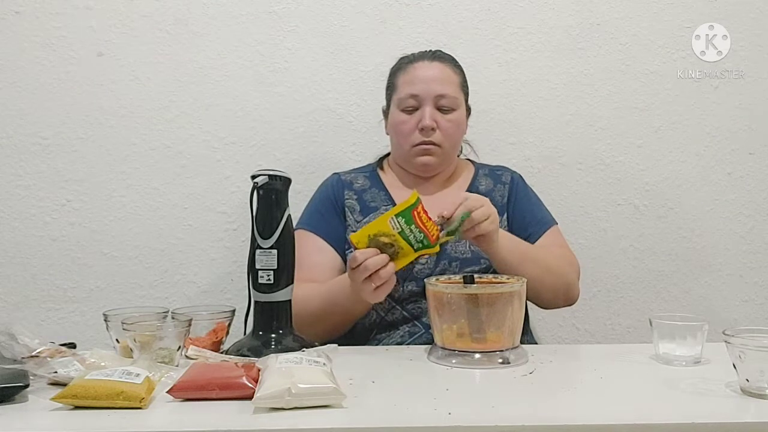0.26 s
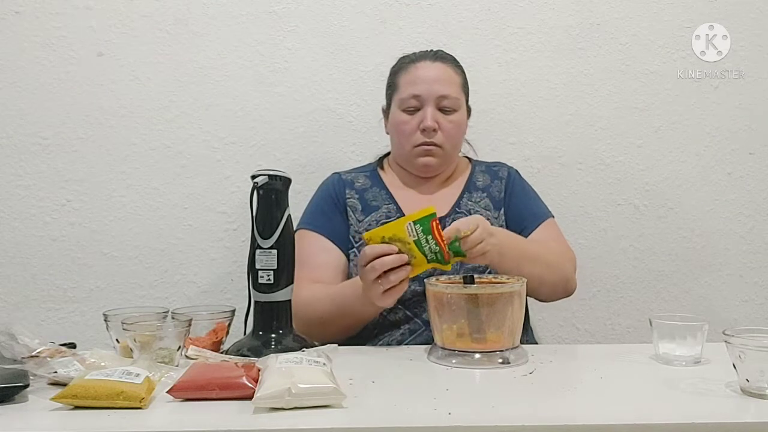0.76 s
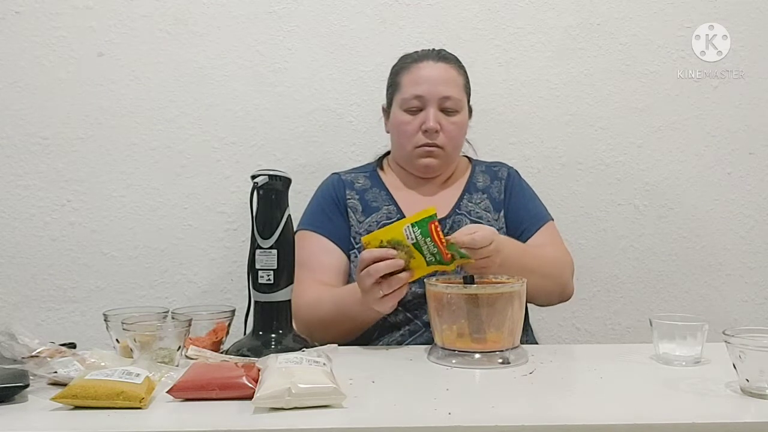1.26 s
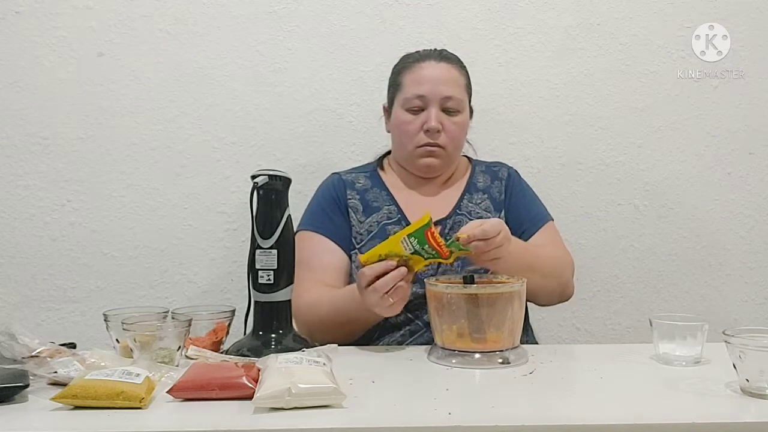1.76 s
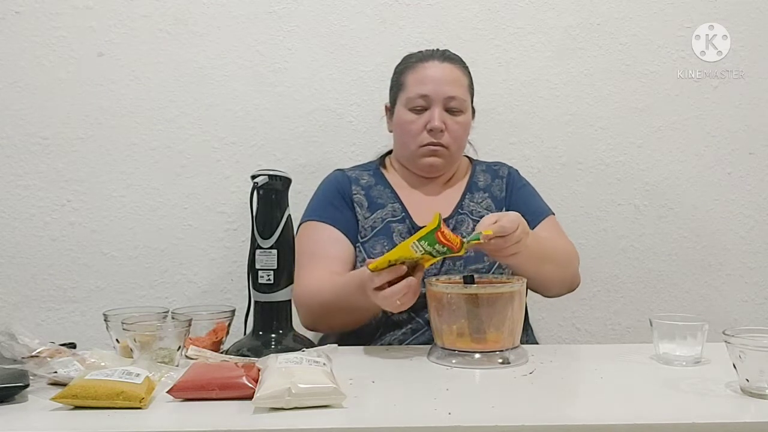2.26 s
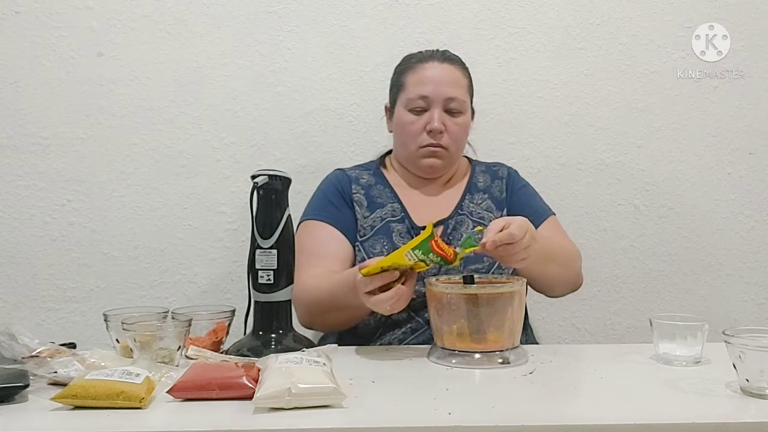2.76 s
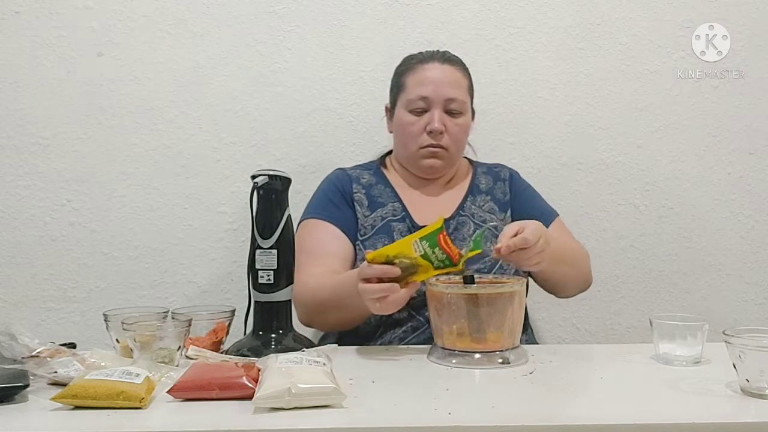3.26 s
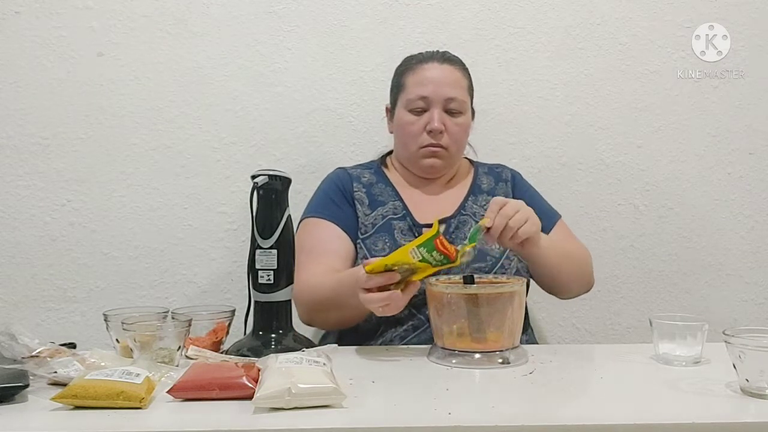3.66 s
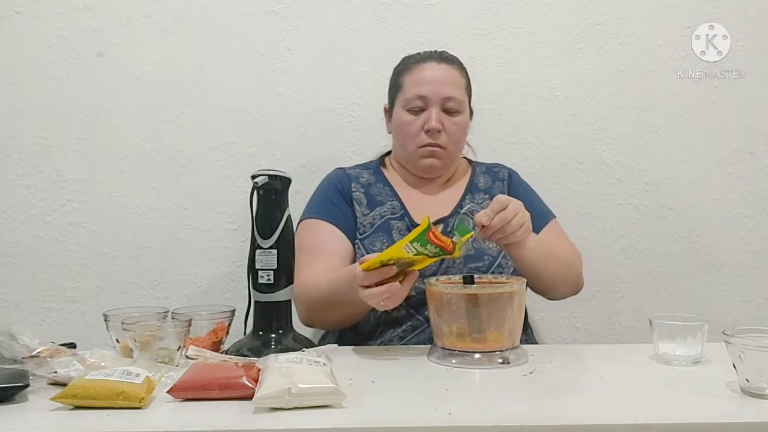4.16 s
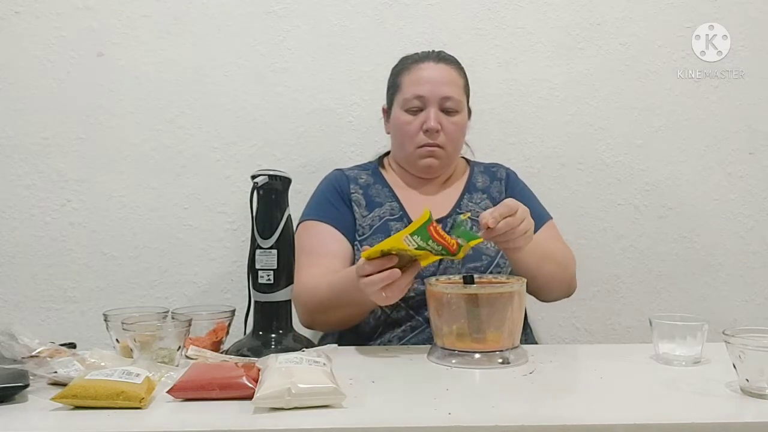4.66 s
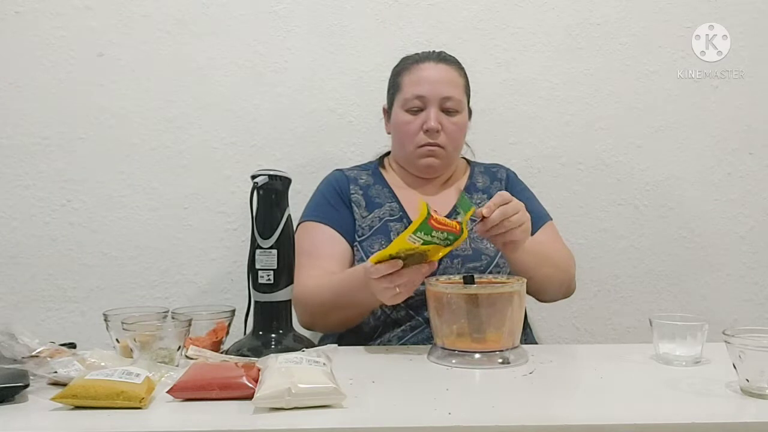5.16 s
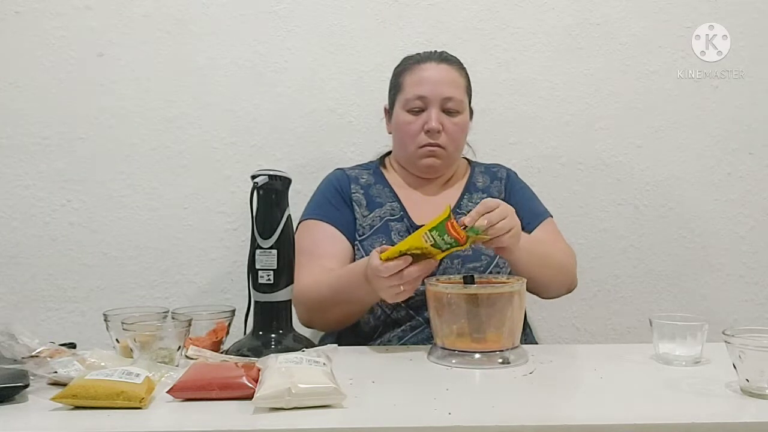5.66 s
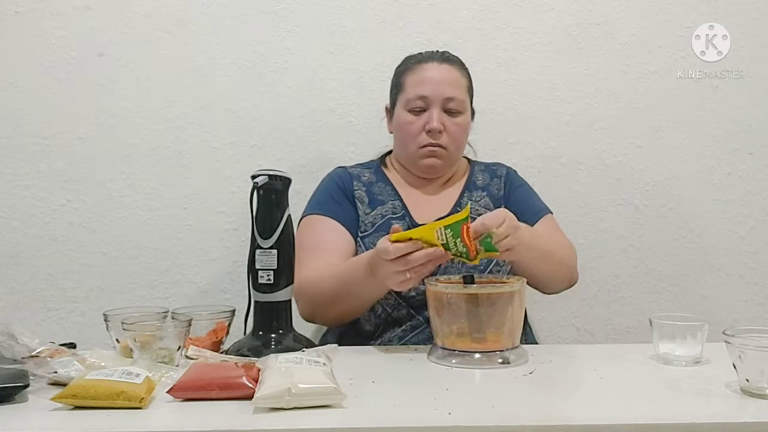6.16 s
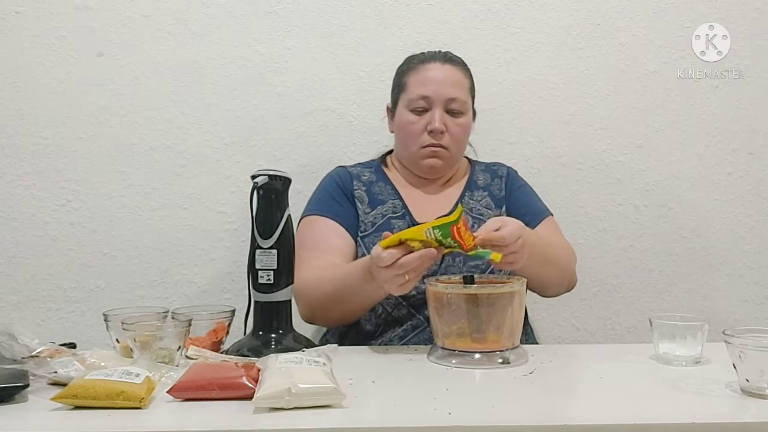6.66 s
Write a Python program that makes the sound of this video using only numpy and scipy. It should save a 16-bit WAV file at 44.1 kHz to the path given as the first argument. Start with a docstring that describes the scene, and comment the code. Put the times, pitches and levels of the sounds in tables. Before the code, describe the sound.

A small bare kitchen, heard from about a metre by a camera's stereo microphone; a low appliance hum with a barely audible whine wavers far off under quiet room noise. Grainy plastic rustle starts at once, and from 0.05 s a stiff sachet snaps: dry bright cracks, papery bursts and small low pops, with short wall reflections. A heavy crackle with a soft low push lands at 0.17 s, a sharp crack at 0.74 s. Irregular clusters continue around 1.0, 1.3, 1.55 and 2.0 s, then thin after 2.5 s, with a few snaps near 3.1 s. From 3.3 to 4.8 s there are mostly faint fingertip rubs and hum. A crack at 4.87 s restarts the crinkling, dense around 5.3 to 5.9 s, including another soft push at 5.78 s. The strongest late cracks come at 6.4 and 6.5 s, with lighter crackles to the end at about 7 s.

```python
"""Small bare kitchen, stiff plastic sachet in the hands, a metre from a camera's two-port microphone.
From the start an appliance hums far off, a sine with a faint whine over low noise, and grainy noise rustles.
Within 0.1 s creases start to snap: a bright crack, a burst from the flat faces, a later, lower pop of the pouch,
each with brief noise tails for the walls; at five listed moments a soft low sine push is added. Dense at first,
the snaps thin out after 2.5 s, leaving mostly soft rubs from 3.3 s; they crowd in again from 4.9 s to the end."""
import sys
import numpy as np
from scipy import signal
from scipy.fft import rfft, irfft, next_fast_len
from scipy.io import wavfile
from scipy.ndimage import map_coordinates

SR = 44100
rng = np.random.default_rng(int(sys.argv[2]) if len(sys.argv) > 2 else 0)


def pcm_store(signal):
    """Save signal as 16-bit PCM."""
    levels = np.round(np.clip(np.atleast_2d(signal), -1, 1) * 32767)
    wavfile.write(sys.argv[1], SR, levels.astype(np.int16).T)


N = 304504

# All levels are those ahead of the microphone; spectra are relative shapes.
# Wavering of the far appliance hum: [t/s, relative level/dB]
HUM_DRIFT = [(0, -56), (.7, -58.5), (1.1, -62.5), (2.1, -53), (2.5, -60), (3.3, -55.5), (4.0, -63),
             (4.7, -66), (4.95, -59), (5.35, -58), (5.5, -62), (5.75, -56.5), (6.13, -61), (6.47, -51.5),
             (6.9, -57.5)]
# Room tone common to both ports: [f/Hz, level/dB]
ROOM_SPECTRUM = [(25, -39), (42, 1), (75, -2.5), (95, -8), (130, -2.5), (200, -16), (350, -7.5),
                 (420, -12.5), (800, -31.5), (1000, -39), (2500, -50), (4500, -43), (9500, -42),
                 (16000, -65)]
# Room tone of opposite sign at the two ports: [f/Hz, level/dB]
SIDE_SPECTRUM = [(18, -40), (30, -16), (49, 1.5), (90, -14.5), (345, -15), (822, -30.5), (1430, -39),
                 (9220, -54), (16000, -48.5)]
# How hard the fingers work the film: [t/s, rustle level/dB]
HAND_EFFORT = [(0, -64), (.08, -56.5), (.3, -64), (.44, -68), (.52, -60), (.67, -54), (.83, -56.5),
               (.94, -68), (1.04, -55), (1.19, -61.5), (1.32, -55.5), (1.9, -64), (2.09, -60), (2.3, -70),
               (2.6, -67), (3.05, -70.5), (3.15, -59.5), (3.3, -79.5), (3.55, -78), (3.85, -82), (4.1, -77),
               (4.82, -80), (5.03, -66.5), (5.35, -54), (5.75, -62.5), (6.1, -67), (6.33, -61),
               (6.45, -60.5), (6.61, -66.5), (6.73, -56.5), (6.9, -62.5)]
# Fingertips sliding over the film: [peak t/s, hiss level/dB, thump level/dB, length/s]
FINGER_RUBS = [(0.513, -54.5, -55, 0.044), (.661, -39, -40, 0.0076), (0.81, -53, -50, 0.029),
               (1.11, -59.5, -82, 0.083), (2.893, -88.5, -55, 0.054), (3.597, -78.5, -69.5, .014),
               (3.975, -64.5, -70, 0.026), (4.121, -62, -69, 0.0075), (4.15, -61.5, -65.5, 0.025),
               (4.344, -94, -54.5, 0.053), (4.383, -55, -55, 0.019), (4.508, -64, -59, 0.026),
               (4.661, -75.5, -63, 0.056), (4.856, -51.5, -68.5, 0.012), (6.2, -58.5, -51, 0.038),
               (6.493, -42, -44, 0.012), (6.499, -43, -58, 0.057)]
# Rustling film: [f/Hz, level/dB]
FILM_SPECTRUM = [(500, -48), (1000, -14), (2500, -5), (4000, -5), (6000, -5.5), (9000, 1), (12000, -9),
                 (16000, -16.5)]
# Flat faces of the sachet: [f/Hz, level/dB]
PANEL_SPECTRUM = [(600, -25.5), (1100, -5), (1800, -5), (2400, -4), (3500, -3.5), (4500, -4), (6000, -40)]
# Squeezed pouch: [f/Hz, level/dB]
POUCH_SPECTRUM = [(70, -27), (150, -3.5), (320, 3.5), (600, 2), (800, 4), (950, -5.5), (1400, -22),
                  (3000, -41.5)]
# Dull body of a finger rub: [f/Hz, level/dB]
THUMP_SPECTRUM = [(90, -33.5), (200, 0), (300, -2), (500, -13.5), (1200, -27), (2500, -52.5)]
# Buckling creases, levels as energy:
# [t/s, crack level/dB, panel level/dB, panel f/Hz, pouch level/dB, settled pouch f/Hz]
CREASE_SNAPS = [(.0456, -43, -19.5, 1730, -20.5, 158), (.077, -30, -21, 1220, -16, 417),
                (.0847, -19.5, -12, 1430, -13, 324), (.1, -24, -22.5, 1900, -16, 198),
                (.1169, -8.5, -5, 2250, -14.5, 310), (.1219, -13, -10.5, 3170, -11, 256),
                (.1428, -32, -33, 2400, -25, 440), (.171, -1.5, 2.5, 2130, 6, 319),
                (.1764, -14.5, -9, 2000, -8, 290), (.2597, -25, -16, 2930, -15, 340),
                (.348, -25, -22, 1410, -18, 365), (.371, -26.5, -29, 1310, -27.5, 455),
                (.4751, -26.5, -19.5, 1780, -26, 570), (.525, -37, -20, 1780, -20.5, 227),
                (.567, -23.5, -22, 2090, -11.5, 237), (.611, -28, -21.5, 2100, -18, 513),
                (.6294, -12.5, -16.5, 1500, -13, 228), (.6396, -29, -17.5, 1900, -18, 504),
                (.6894, -26, -14.5, 1200, -8.5, 300), (.7057, -9, -4, 1600, -6.5, 610),
                (.7353, 6, 0.5, 2860, -4.5, 229), (.773, -13, -21, 2600, -24, 377),
                (.8138, -21.5, -14, 1260, -22, 470), (.834, -23.5, -15, 1300, -10, 392),
                (.913, -47, -25, 1360, -33, 617), (.9403, -28, -17, 2000, -18, 445),
                (.9547, -12, -9, 1060, 0.5, 706), (.9851, -25.5, -9, 2070, -5.5, 433),
                (1.0154, -39, -12.5, 1170, -34, 410), (1.1963, -30.5, -25, 1100, -15, 270),
                (1.2242, -42, -23, 1400, -20, 580), (1.2554, -32.5, -14.5, 1170, -8.5, 445),
                (1.2949, -7, -11.5, 2940, -21, 328), (1.2646, -32.5, -14.5, 1520, -27, 555),
                (1.3192, -24.5, -16, 1890, -14.5, 650), (1.3903, -37.5, -32, 1100, -15.5, 368),
                (1.5318, -23, -13.5, 1300, -8.5, 298), (1.5418, -14, -10, 2540, -7, 473),
                (1.5475, -6, -13.5, 2730, -31, 436), (1.6129, -20.5, -29, 2400, -34, 527),
                (1.6456, -21, -29, 2500, -20.5, 395), (1.6964, -41, -25, 1400, -16.5, 570),
                (1.7114, -17, -9, 1160, -12.5, 257), (1.913, -29, -17.5, 1490, -15, 508),
                (1.9696, -26, -15, 1310, -13.5, 570), (2.0065, -8.5, -6.5, 1200, -9.5, 438),
                (2.0125, -15.5, -2.5, 2140, -9, 776), (2.02, -13.5, -.5, 2050, -8.5, 763),
                (2.0384, -15, -42, 2700, -17, 735), (2.1995, -22.5, -12.5, 2500, -13.5, 368),
                (2.335, -37, -39, 1100, -22.5, 835), (2.4257, -37, -34, 1180, -23, 790),
                (2.4459, -47, -24.5, 1280, -27, 590), (2.7276, -17, -9.5, 2780, -26, 815),
                (3.0616, -21.5, -19, 3070, -21.5, 332), (3.1359, -35, -42, 1800, -21.5, 850),
                (3.1453, -11, -17, 1600, -18, 217), (3.1494, -13.5, -24, 2400, -32, 280),
                (3.1648, -24, -15, 2082, -16.5, 638), (3.2264, -46, -29, 1450, -37.5, 165),
                (4.872, -5.5, -13, 1677, -18, 597), (4.9263, -23.5, -17, 3040, -16, 750),
                (4.9598, -26, -36, 2400, -29, 745), (4.9862, -27, -41, 2700, -41, 800),
                (5.0678, -25.5, -30, 2400, -47, 635), (5.1316, -44, -23.5, 1510, -25, 191),
                (5.211, -20, -13, 3150, -17, 332), (5.2461, -18.5, -20, 2970, -39, 400),
                (5.2731, -20.5, -31, 1200, -29, 160), (5.3025, -13.5, -21.5, 2870, -10.5, 323),
                (5.3568, -39, -38, 1800, -20, 436), (5.3649, -25, -40, 1600, -28, 587),
                (5.3811, -20, -19.5, 3700, -42, 484), (5.3957, -42, -28, 1200, -23, 810),
                (5.426, -16.5, -20, 3220, -44, 470), (5.4437, -19.5, -19.5, 3500, -29, 820),
                (5.5133, -16.5, -8, 1980, -8.5, 730), (5.5554, -12, -15.5, 2000, -8, 448),
                (5.5607, -25, -20, 1400, -13.5, 456), (5.5886, -1.5, -5, 2790, -5.5, 450),
                (5.6492, -6.5, -7, 2840, -10.5, 452), (5.6559, -16.5, -18, 2100, -22, 635),
                (5.6662, -3.5, -2, 2490, -13.5, 600), (5.7455, -26, -15, 1380, -15.5, 540),
                (5.7749, -19, -7, 2100, -7, 720), (5.7847, -20, -12.5, 1600, -8, 550),
                (5.87, -10.5, -7.5, 2510, -14, 546), (5.9008, -30, -15, 1800, -10.5, 460),
                (5.9794, -32, -20.5, 1540, -19.5, 506), (6.1912, -43, -28, 1600, -23, 304),
                (6.2139, -42, -31, 1700, -18, 460), (6.2404, -26, -27, 2600, -32, 328),
                (6.3973, 5, -.5, 2460, -6.5, 744), (6.4516, -16, -1, 2540, -13, 320),
                (6.4593, -31, -14, 2800, -10, 370), (6.4923, 3.5, -1, 2360, -2, 414),
                (6.5482, -12, -6.5, 2420, -10.5, 630), (6.5573, -29, -17, 2700, -21, 690),
                (6.678, -43, -30, 1300, -27, 800), (6.7218, -19, -18.5, 2380, -13, 260),
                (6.7412, -31, -20, 1100, -28, 590), (6.7527, -18, -33, 2300, -23, 260),
                (6.7908, -41, -31.5, 1600, -21.5, 736), (6.878, -43, -37, 1100, -23.5, 770)]
# Bright crack of a crease: [f/Hz, level/dB]
CRACK_SPECTRUM = [(1500, -33.5), (4000, 1), (6000, -1.5), (9000, 2), (12000, -8), (16000, -24)]
# The full pouch lurches in the palm: [t/s, level/dB, f/Hz]
POUCH_LURCHES = [(0.097, -34.5, 129), (0.172, -21, 95.8), (1.538, -37, 117), (5.778, -27, 126),
                 (6.496, -34, 113)]
# Response of the microphone in its camera housing: [f/Hz, level/dB]
HOUSING_RESPONSE = [(900, -0.5), (1250, 3.5), (1800, -5), (2400, 0), (2900, -3), (3500, 0), (4500, -15.5),
                    (5600, 1), (14800, 2), (15800, -10.5)]

BAND_LIMIT_HZ = 16520
ORDINARY_DB = -60  # rustle of ordinary handling
CRUMPLE_DB, CRUMPLE_GROWTH = -63.5, 1.036  # faces at ordinary handling; dB per dB of rustle
GROAN_DB, GROAN_GROWTH = -60.5, 0.67  # pouch, likewise
# Lesser creases give way at random, oftener under busy fingers
SMALL_COUNT, RATE_GROWTH = 44, 1.4  # number; dB of crease rate per dB of rustle
SMALL_DB = (-32.5, -31, -28)  # crack, panel, pouch at ordinary handling, before scatter
SMALL_SCATTER_DB, SMALL_GROWTH = 6.5, 0.61  # spread; dB per dB of rustle
SMALL_HZ, SMALL_OCTAVES = (2000, 413), 0.55  # middle panel and pouch pitch; spread


def amp(db):
    """Amplitude for a level in dB."""
    return 10 ** (np.asarray(db) / 20)


def along(points, hz):
    """Interpolate (f/Hz, value) points on a log frequency axis."""
    f, value = np.transpose(points)
    return np.interp(np.log(hz + 1), np.log(f + 1), value)


def curves(rows):
    """One value per sample for each column after the time."""
    s, *columns = np.transpose(rows)
    return [np.interp(np.arange(N) / SR, s, column) for column in columns]


def wobble(rate):
    """A smooth random curve, rate knots a second."""
    knots = rng.standard_normal(int(N * rate / SR) + 4)
    return map_coordinates(knots, [np.arange(N) * rate / SR])


def coloured(x, spectrum):
    """Filter rows of x by a minimum-phase kernel of unit energy with the given (f/Hz, level/dB) shape."""
    size = 4096
    cepstrum = irfft(np.log(amp(along(spectrum, np.fft.rfftfreq(size, 1 / SR)))))
    # fold the cepstrum onto positive time to make the filter causal
    cepstrum[1:size // 2] *= 2
    cepstrum[size // 2 + 1:] = 0
    kernel = irfft(np.exp(rfft(cepstrum)))
    kernel = kernel / np.linalg.norm(kernel)
    x = np.atleast_2d(x)
    return signal.fftconvolve(x, kernel[None], axes=1)[:, :x.shape[1]]


def burst(t, t60, rise):
    """A swell over about rise seconds under a decay of 60 dB in t60 seconds."""
    return amp(-60 * t / t60) * (1 - np.exp(-t / rise))


def with_energy(rows, db):
    """Bring each row to an energy set by its dB."""
    return rows / np.linalg.norm(rows, axis=1, keepdims=True) * amp(db)


def room_tone():
    """A motor hum, stronger at the right port, with a faint whine, over low room noise."""
    t = np.arange(N) / SR
    hum_level = amp(curves(HUM_DRIFT)[0] + 8.0 + 2.6 * wobble(9))
    hum = hum_level * np.sin(2 * np.pi * 59.3 * t + wobble(4.5) / 2)
    whine_level = amp(-76 + 3 * wobble(12))
    whine = whine_level * np.sin(2 * np.pi * 801 * t + 1.1 * wobble(25))
    motor = hum * amp([[-.9], [.9]]) + whine * amp([[-2.5], [2.5]])  # left, right port
    mid = amp(-59.0) * coloured(rng.standard_normal(N), ROOM_SPECTRUM)
    side = amp(-68.5) * coloured(rng.standard_normal(N), SIDE_SPECTRUM)
    return motor + mid + side * [[1], [-1]]


def grainy(rate, t60, share):
    """Noise studded with clumps of tiny decaying ticks, about rate a second."""
    size_db = np.minimum(3 * rng.exponential(size=N), 11)
    chance = rate / SR * amp(5 * wobble(15))
    ticks = (rng.random(N) < chance) * amp(size_db)
    grain = np.convolve(ticks, amp(-60 * np.arange(512) / SR / t60))[:N]
    flutter = amp(2.2 * wobble(30) + 1.6 * wobble(120))
    return rng.standard_normal(N) * (flutter + share * grain)


def finger_rubs():
    """Each slide of a fingertip swells and fades as a bell curve: hiss and thump amplitudes."""
    t = np.arange(N) / SR
    hiss, thump = np.zeros(N), np.zeros(N)
    for s, hiss_db, thump_db, length in FINGER_RUBS:
        stroke = np.exp(-((t - s) / length) ** 2)
        hiss += amp(hiss_db) * stroke
        thump += amp(thump_db) * stroke
    return hiss, thump


def rustle():
    """Tiny creases tick over the hiss of skin on film; squeezed faces crumple and the pouch groans."""
    rustle_db = curves(HAND_EFFORT)[0]
    effort_db = rustle_db - ORDINARY_DB
    hiss, thump = finger_rubs()
    film = grainy(380, 0.0025, 0.95) * (amp(rustle_db) + hiss)
    faces = grainy(280, 0.0065, 0.74) * amp(CRUMPLE_DB + CRUMPLE_GROWTH * effort_db)
    groan_db = GROAN_DB + GROAN_GROWTH * effort_db + 3.2 * wobble(25) + 0.83 * wobble(70)
    groan = rng.standard_normal(N) * amp(groan_db)
    thumps = rng.standard_normal(N) * thump
    layers = [(film, FILM_SPECTRUM), (faces, PANEL_SPECTRUM),
              (groan, POUCH_SPECTRUM), (thumps, THUMP_SPECTRUM)]
    return sum(coloured(x, spectrum)[0] for x, spectrum in layers)


def small_snaps():
    """Rows like CREASE_SNAPS for lesser creases, placed and sized by the fingers' effort."""
    effort_db = curves(HAND_EFFORT)[0] - ORDINARY_DB
    done = np.cumsum(amp(RATE_GROWTH * effort_db))
    luck = rng.random(SMALL_COUNT)
    draw = rng.standard_normal((SMALL_COUNT, 5))
    # one crease falls somewhere in each equal share of the total work
    at = np.searchsorted(done / done[-1], (np.arange(SMALL_COUNT) + luck) / SMALL_COUNT)
    usual_db = np.add(SMALL_DB, SMALL_GROWTH * effort_db[at, None])
    scatter_db = SMALL_SCATTER_DB * np.minimum(draw[:, :3], 1)
    crack_db, panel_db, pouch_db = (usual_db + scatter_db).T
    panel_hz, pouch_hz = (SMALL_HZ * 2 ** (SMALL_OCTAVES * draw[:, 3:])).T
    return np.transpose([at / SR, crack_db, panel_db, panel_hz, pouch_db, pouch_hz])


def crease_crack(noise, t):
    """The buckling crease itself: a bright noise burst with the sharpest attack."""
    return coloured(noise * burst(t, .0055, .0003), CRACK_SPECTRUM)


def panel_burst(noise, t, panel_hz):
    """The face that gave way rings broadly, a damped resonance over some direct noise."""
    size = len(t)
    f = np.fft.rfftfreq(size, 1 / SR)
    face = 1j * f * 0.43 * panel_hz / (panel_hz ** 2 - f * f + 1j * f * 0.55 * panel_hz)
    struck = coloured(noise * burst(t, 0.0083, 0.001), PANEL_SPECTRUM)
    return irfft(rfft(struck) * (face + 0.32), size)


def pouch_pop(noise, t, pouch_hz):
    """A late pop that drops in pitch as the air pocket relaxes, with a noisy flap of the film."""
    late = np.clip(t - .0015, 0, None)  # starts 1.5 ms after the crack
    cycles = pouch_hz * (late + 0.00077 * (1 - np.exp(-late / 0.00066)))
    tone = np.sin(2 * np.pi * cycles) * burst(late, 0.023, 0.0014)
    flap = coloured(noise * burst(late, 0.016, 0.0026), POUCH_SPECTRUM)
    return tone + 1.03 * flap


def snaps():
    """Treble leaves the crease first; slower bending waves bring panels and pouch; walls answer."""
    size, long = 1536, 12288  # samples of a snap and of its wall answer
    rows = np.vstack([CREASE_SNAPS, small_snaps()])
    s, crack_db, panel_db, panel_hz, pouch_db, pouch_hz = rows.T[:, :, None]
    t, tail_t = np.arange(size) / SR, np.arange(long) / SR
    crack_noise, panel_noise, pouch_noise = rng.standard_normal((3, len(s), size))
    crack = with_energy(crease_crack(crack_noise, t), crack_db)
    panel = with_energy(panel_burst(panel_noise, t, panel_hz), panel_db)
    pouch = with_energy(pouch_pop(pouch_noise, t, pouch_hz), pouch_db)
    # each snap gets its own fresh noise tail; the treble returns weakest
    low, mid, high = rng.standard_normal((3, len(s), long))
    tails = low * burst(tail_t, 0.21, 0.0037)
    tails = amp(-8.5) * tails / np.linalg.norm(tails[0])
    heard = signal.fftconvolve(pouch, tails, axes=1)[:, :long]
    panel_tail = coloured(mid * burst(tail_t, 0.27, 0.0016), PANEL_SPECTRUM)
    heard += with_energy(panel_tail, panel_db - 8)
    crack_tail = coloured(high * burst(tail_t, 0.32, 0.00067), CRACK_SPECTRUM)
    heard += with_energy(crack_tail, crack_db - 10.5)
    heard[:, :size] += pouch + panel + crack
    where = np.round(s * SR).astype(int) + np.arange(long)
    return np.bincount(where.ravel(), heard.ravel(), N + long)[:N]


def thuds():
    """Each lurch of the full pouch in the palm is one soft low push, a quickly fading sine."""
    t = np.arange(N) / SR
    pushes = np.zeros(N)
    for s, db, hz in POUCH_LURCHES:
        swell = burst(np.clip(t - s, 0, None), 0.062, 0.0013)
        pushes += amp(db) * np.sin(2 * np.pi * hz * (t - s)) * swell
    return pushes


def scene():
    """Sachet sounds equal at both ports, over the two-port room tone."""
    return room_tone() + rustle() + snaps() + thuds()


def record(dry):
    """The housing ripples the mids and dips the upper mids; nothing passes above the band limit."""
    size = next_fast_len(N + 8192)
    passed = np.fft.rfftfreq(size, 1 / SR) < BAND_LIMIT_HZ
    housed = amp(-3.5) * coloured(dry, HOUSING_RESPONSE)
    return irfft(rfft(housed, size) * passed, size)[:, :N]


dry = scene()
out = record(dry)
pcm_store(out)
```